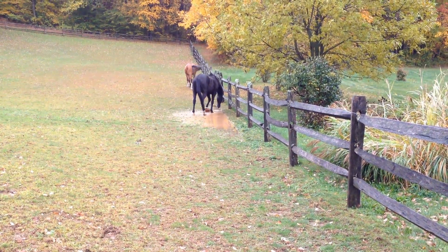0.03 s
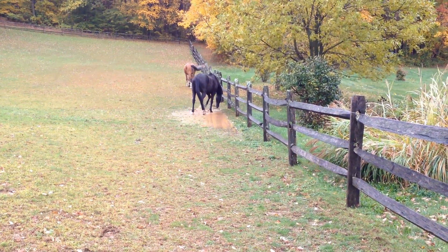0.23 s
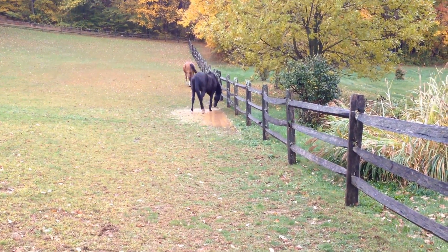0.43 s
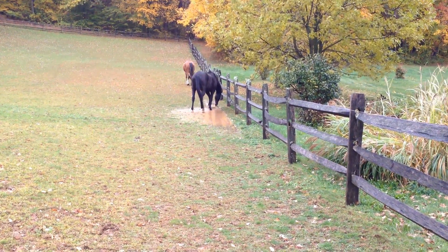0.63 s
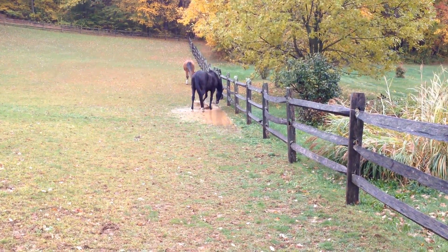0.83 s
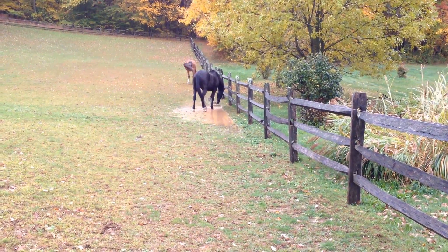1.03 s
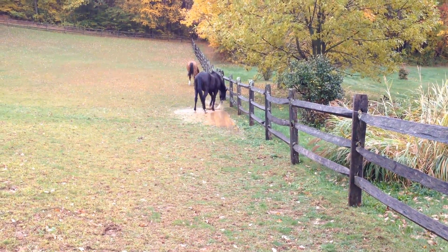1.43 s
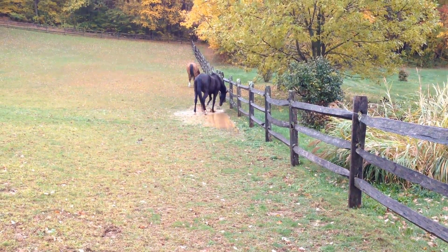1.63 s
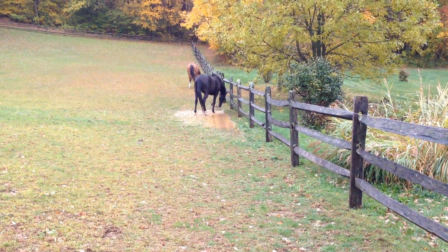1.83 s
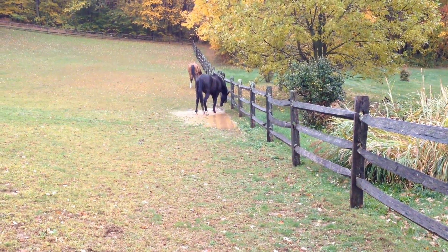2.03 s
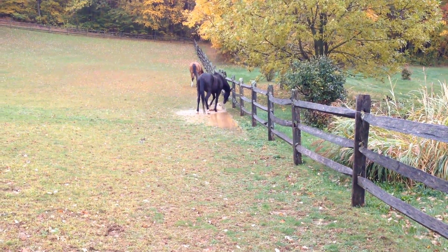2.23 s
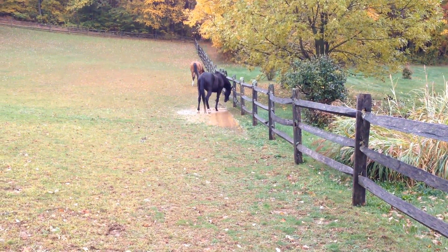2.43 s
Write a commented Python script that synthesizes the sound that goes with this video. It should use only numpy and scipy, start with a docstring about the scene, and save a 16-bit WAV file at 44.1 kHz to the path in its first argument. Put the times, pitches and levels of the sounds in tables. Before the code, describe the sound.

Splashes come in a steady rhythm as a horse drags its hoof through a puddle outdoors, with sloshing, pattering drops and small plops. Low wind flutters bump the microphone throughout, and an insect trills faintly in the background.

```python
"""Horse pawing a puddle

Out in a pasture, some way from the microphone, a horse paws a muddy puddle about every 0.7 s.
Each stroke churns the water, throws spray that patters back and ends in a sharp slap; a few bubbles
plop. Wind buffets the microphone in soft low flutters and bumps, over a faint insect trill and a
quiet, distant hiss."""
import sys
import numpy as np
from scipy import signal
from scipy.fft import rfft, irfft
from scipy.io import wavfile
from scipy.ndimage import uniform_filter1d

SR = 44100
rng = np.random.default_rng(int(sys.argv[2]) if len(sys.argv) > 2 else 0)


def pcm_store(signal):
    """Save signal as 16-bit PCM."""
    levels = np.round(np.clip(np.atleast_2d(signal), -1, 1) * 32767)
    wavfile.write(sys.argv[1], SR, levels.astype(np.int16).T)


N = 110250
T = np.arange(N) / SR


def slaps(rise_s=0.00089, ring_width_hz=520):
    """Hoof and thrown water hit the puddle: fine splatter and the short ring of a trapped air pocket."""
    # slaps: start_s, level_db, decay_s, ring_hz, ring_over_splatter_db
    hits = [(0.253, -61, .004, 1097, 9), (.378, -64.5, 0.0041, 966, 12.5), (0.378, -67.5, 0.0047, 1970, 14),
            (.436, -60, .006, 2100, 9), (.447, -60.5, 0.0085, 4400, 4), (.575, -63, .007, 4540, -3),
            (0.7113, -52, 0.0052, 2000, 1), (.713, -56, .005, 5910, 2.5), (0.7246, -47.5, 0.0074, 1908, 5),
            (0.761, -57, 0.0034, 6560, -8), (1.005, -59, 0.0093, 2470, 8), (1.066, -60, 0.0037, 8320, 3.5),
            (1.4446, -51.5, 0.0062, 1124, 8), (1.4461, -50, 0.011, 4400, 8), (1.455, -57, .007, 2100, 6.5),
            (1.477, -52.5, 0.008, 2070, 2), (1.489, -49, .004, 4570, 0), (1.593, -65, 0.018, 2090, 0),
            (1.608, -62.5, 0.0042, 1350, 9), (1.634, -69, .004, 2100, 13), (1.663, -57.5, 0.0034, 2030, 7),
            (1.733, -60.5, 0.011, 4240, 2.5), (1.798, -59, 0.007, 2110, 4), (2.147, -52, 0.007, 1680, -1),
            (2.181, -53, 0.011, 5480, -7), (2.236, -53, 0.0064, 4360, -11),
            (2.2434, -52.5, 0.011, 2112, 10), (2.247, -55.5, 0.0062, 1361, 5),
            (2.247, -61.5, .006, 676, 12), (2.476, -67.5, .003, 4400, 7.5)]
    # splatter spectrum: frequency_hz, gain_db
    spectrum = [(150, -22), (600, -15), (1000, -7), (1400, 1), (2200, 1), (3200, -7), (4400, 3.5),
                (6000, 0.5), (8500, -1), (10300, -10.5), (13000, -2), (14300, -18), (15700, -32)]
    splatter = colour(clumped(rng.standard_normal(N), patchy_db=2.5), spectrum)
    smooth = signal.butter(2, ring_width_hz / 2, fs=SR, output="sos")
    out = np.zeros(N)
    for start, db, decay, hz, ring_db in hits:
        wobble = signal.sosfilt(smooth, rng.standard_normal(N) + 1j * rng.standard_normal(N))
        wobble /= np.sqrt(abs(wobble) + 1e-12)  # evens out the ring's loudness
        cavity = unit((wobble * np.exp(2j * np.pi * hz * T)).real)
        ring = amp(ring_db) * cavity * strike(start, rise_s, decay * 0.53)
        out += amp(db) * (splatter * strike(start, rise_s, decay) + ring)
    return out


def plops(rise_s=0.0044):
    """Single larger bubbles swell and ring out in the puddle."""
    # bubbles: start_s, level_db, pitch_hz, decay_s
    bubbles = [(.186, -55, 1290, .009), (.506, -52.5, 2090, .005), (.591, -52, 2100, 0.0036),
               (.986, -51, 680, 0.0036), (1.009, -40.5, 1917, 0.0035), (1.016, -54.5, 603, .007),
               (1.042, -56.5, 1227, .007), (1.593, -48, 2060, 0.005), (1.711, -51.5, 538, 0.0032),
               (1.776, -57, 863, 0.0032), (1.822, -60, 735, .007), (1.858, -55, 1980, 0.0046),
               (2.150, -43.5, 1870, 0.0022)]
    out = np.zeros(N)
    for start, db, hz, decay in bubbles:
        t = np.maximum(T - start, 0)
        onset = np.minimum(t / rise_s, 1) * np.exp(np.minimum(t, rise_s) / decay)  # holds off the decay
        out += amp(db) * bubble(t, hz, decay) * onset
    return out


def spray(wash_gain=0.77):
    """Drops fall back on the puddle in clumps, over a finer wash."""
    # falling spray: time_s, level_db
    fall = [(0, -74.5), (.22, -73), (.36, -66.5), (.46, -61.5), (.58, -56.5), (.68, -70), (.74, -58),
            (.81, -73), (.96, -73), (1.02, -63.5), (1.25, -63), (1.42, -56.5), (1.5, -59), (1.57, -68),
            (1.61, -62), (1.69, -67), (1.86, -59.5), (2.04, -60.5), (2.21, -56), (2.27, -59.5), (2.33, -69),
            (2.5, -73)]
    # spray spectrum: frequency_hz, gain_db
    spectrum = [(400, -20), (1500, -11.5), (2200, 5.5), (3350, -10.5), (4030, 1.5), (4230, -1.5),
                (4550, 8.5), (5050, -5), (5400, 1), (6000, -1), (7000, -5.5), (8500, -2), (10000, -12),
                (11500, -7), (12800, -2), (14200, -15), (15700, -9)]
    drops = unit(patter(per_s=3500, spread_db=3.5))
    wash = wash_gain * rng.standard_normal(N)
    return colour(clumped(drops + wash, patchy_db=2.5), spectrum) * level(fall)


def churn():
    """The leg stirs the water to froth and drags deep sloshes through it."""
    # churned water: time_s, level_db
    stirring = [(0, -62.5), (.12, -79), (.26, -67.5), (.31, -69.5), (.38, -62.5), (.58, -66.5), (.66, -75),
                (.93, -80), (.99, -60.5), (1.05, -68), (1.1, -64), (1.3, -71.5), (1.48, -65), (1.56, -80),
                (1.6, -57), (1.69, -72.5), (1.73, -61.5), (1.9, -62), (2.02, -71), (2.22, -62.5),
                (2.32, -71), (2.5, -87)]
    # churn spectrum: frequency_hz, gain_db
    stir_spectrum = [(250, -34), (600, 2), (1000, -3.5), (1400, 3.5), (1700, 1.5), (2100, 6), (2600, -5),
                     (3300, -7), (6000, -16)]
    # deep sloshes: start_s, length_s, level_db
    sloshes = [(.22, 0.092, -61.5), (.965, .095, -57.5), (1.58, 0.063, -70), (1.71, 0.12, -72.5)]
    # slosh spectrum: frequency_hz, gain_db
    slosh_spectrum = [(50, -32), (200, 28), (400, 10), (700, 1), (1300, 0.5), (2200, -24), (5000, -50)]
    return froth(stir_spectrum) * level(stirring) + froth(slosh_spectrum) * swells(sloshes, edge_s=0.01)


def froth(spectrum, sizes=36, bubbles_per_s=1200, decay_cycles=4.3):
    """A crowd of small, quickly damped bubbles of many sizes."""
    t, out = T[:2048], np.zeros(N)
    for hz in np.geomspace(300, 4000, sizes):
        grain = unit(bubble(t, hz * rng.uniform(1.0, 1.04), decay_cycles / hz)) * np.sqrt(hz)
        out += signal.oaconvolve(patter(bubbles_per_s / sizes, spread_db=3), grain)[:N]
    return colour(out, spectrum)


def bubble(t, hz, decay_s, glide_per_s=4.2):
    """A ringing bubble whose pitch climbs as it nears the surface."""
    return np.sin(2 * np.pi * hz * (t + glide_per_s * t * t / 2)) * np.exp(-t / decay_s)


def patter(per_s, spread_db):
    """Random clicks of either sign, a few much larger than the rest."""
    size = amp(spread_db * np.minimum(rng.exponential(1, N), 4))
    return size * rng.choice([-1., 1.], N) * (rng.random(N) < per_s / SR)


def clumped(x, patchy_db):
    """Drops land in clumps: patches a few hundred Hz wide and some ms long swell and fade at random."""
    bands = signal.stft(x, nperseg=256, noverlap=192)[2]
    patches = rng.standard_normal(bands.shape[::-1]).T
    patches = uniform_filter1d(patches, size=3, axis=0)  # across frequency
    patches = unit(uniform_filter1d(patches, size=7, axis=1))  # along time
    return unit(signal.istft(bands * amp(patchy_db * patches), nperseg=256, noverlap=192)[1][:N])


def wind(steadiness=0.21, low_cut_hz=53.6):
    """Turbulence right at the microphone: flutters, a breeze and bumps, thinned by the wind filter."""
    # flutters: start_s, length_s, level_db
    gusts = [(.218, 0.091, -49), (.505, 0.035, -53.5), (.657, .047, -50), (.76, 0.015, -52),
             (.826, 0.15, -49.5), (.97, 0.194, -50.5), (1.397, .07, -51.5), (1.578, 0.045, -54.5),
             (1.655, 0.017, -54), (1.89, 0.078, -51), (2.02, 0.078, -50), (2.105, 0.061, -51)]
    # flutter spectrum: frequency_hz, gain_db
    gust_spectrum = [(20, -52), (40, -46), (65, -7), (100, -3), (145, 3), (190, -5), (250, -10), (330, -16),
                     (450, -32), (800, -57), (2000, -60)]
    # unbroken breeze: time_s, level_db
    breeze_levels = [(0, -58.5), (.55, -59.5), (.8, -70), (1.18, -61), (1.3, -65.5), (1.55, -63),
                     (1.75, -64.5), (1.81, -74), (2.1, -62.5), (2.25, -64), (2.32, -63), (2.5, -65)]
    # breeze spectrum: frequency_hz, gain_db
    breeze_spectrum = [(20, -45), (40, -28), (70, -3), (110, 2), (160, 0), (220, -8), (300, -12),
                       (450, -24.5), (800, -61), (2000, -65)]
    eddies = signal.hilbert(colour(rng.standard_normal(N), gust_spectrum))
    flutter = unit(eddies.real / (abs(eddies) + 0.27) ** steadiness) * swells(gusts, edge_s=0.008)
    breeze = colour(rng.standard_normal(N), breeze_spectrum) * level(breeze_levels)
    wind_filter = signal.butter(2, low_cut_hz, "highpass", fs=SR, output="sos")
    return signal.sosfiltfilt(wind_filter, flutter + breeze + bumps())


def bumps(rise_share=0.84, sag_per_s=4.4, puff_db=-22.5):
    """Single pushes of air on the microphone: a low thump that sags in pitch, with a soft puff."""
    # bumps of air: peak_s, level_db, pitch_hz, fall_s
    pushes = [(.084, -41.5, 130, 0.0048), (0.225, -37.5, 155, 0.0058), (0.237, -39.5, 202, 0.0046),
              (0.249, -41, 222, 0.0069), (.266, -39, 197, 0.0081), (.291, -32, 188, 0.0038),
              (.372, -42, 187, 0.0031), (.416, -44.5, 157, 0.0058), (.4845, -39.5, 290, 0.0032),
              (0.488, -29, 140, 0.0052), (0.497, -30, 163.5, 0.0095), (.617, -46.5, 134, 0.0036),
              (.666, -52, 158, 0.0085), (.691, -44, 173, .008), (.834, -38.5, 183, 0.0051),
              (.863, -42, 179, 0.0078), (0.894, -40.5, 180, 0.0084), (.922, -40, 162, 0.0088),
              (.956, -43, 162, 0.0095), (.981, -43, 164, 0.0033), (1.012, -37, 162, .005),
              (1.034, -40, 168, 0.0036), (1.047, -36.5, 190, 0.0034), (1.072, -39.5, 147, 0.0056),
              (1.095, -39.5, 170, 0.0026), (1.113, -34, 146, 0.0067), (1.143, -36, 182, 0.0059),
              (1.407, -42, 214, 0.0081), (1.447, -34, 175.5, 0.0061), (1.583, -44, 226, 0.0061),
              (1.594, -40, 163, 0.0043), (1.895, -41.5, 169, 0.0038), (1.924, -35.5, 155, 0.0048),
              (2.0484, -27, 173, 0.0067), (2.057, -28.5, 207, 0.0031), (2.069, -34.5, 164, 0.0033),
              (2.147, -41, 133, 0.0049)]
    # puff spectrum: frequency_hz, gain_db
    spectrum = [(120, -18), (280, 6), (430, -1.5), (650, -17), (1500, -36)]
    puff = amp(puff_db) * colour(rng.standard_normal(N), spectrum)
    out = np.zeros(N)
    for peak, db, hz, fall in pushes:
        t = T - peak
        width = np.where(t < 0, rise_share * fall, fall)
        thump = np.cos(2 * np.pi * hz * (t - sag_per_s * t * t / 2))
        out += amp(db) * np.exp(-(t / width) ** 2) * (thump + puff)
    return out


def insect(level_db=-73, pitch_hz=6650, fall_hz=380, jitter_hz=125):
    """A thin trill in the grass: wing strokes pulse in groups, each stroke falling in pitch."""
    # swell and fade of the trill: time_s, gain_db
    swell = [(0, 1.5), (.5, -1.5), (1, 0), (1.3, 0), (2.2, -2.5), (2.5, -2.5)]
    strokes_per_s, groups_per_s, group_depth = 53, 14.3, 0.32
    stroke = (T * strokes_per_s + rng.random()) % 1
    jitter = unit(uniform_filter1d(rng.standard_normal(N), size=60))
    hz = pitch_hz + fall_hz * (.5 - stroke) + jitter_hz * jitter
    groups = 1 + group_depth * np.sin(2 * np.pi * (groups_per_s * T + rng.random()))
    trill = np.sin(np.pi * stroke) * groups * np.sin(2 * np.pi * np.cumsum(hz) / SR)
    return amp(level_db) * level(swell) * unit(trill)


def pasture(x, echo_db=-17.5, t60_s=0.04):
    """Adds faint, short scatter from ground, fence and trees."""
    t = T[:SR // 4]
    tail = rng.standard_normal(len(t)) * amp(-60 * t / t60_s) * (t > .003)
    return x + amp(echo_db) * signal.fftconvolve(x, tail / np.linalg.norm(tail))[:N]


def distant_hiss(level_db=-64.5):
    """The steady hiss of the outdoors, far off."""
    # hiss spectrum: frequency_hz, gain_db
    spectrum = [(20, -34), (60, -18), (150, 6.5), (300, 2.5), (500, -0.5), (1000, -3.5), (2000, -1.5),
                (3300, -11.5), (4000, -9), (4550, -4.5), (5100, -16), (6500, -4.5), (7400, -9),
                (10000, -16), (13000, -16.5), (15700, -18)]
    return amp(level_db) * colour(rng.standard_normal(N), spectrum)


def amp(db):
    """Decibels to gain."""
    return 10 ** (np.asarray(db) / 20)


def unit(x):
    """Scales to rms 1."""
    return x / np.sqrt(np.mean(x ** 2) + 1e-20)


def level(points):
    """Gain over time from points of time_s, level_db."""
    return amp(np.interp(T, *np.transpose(points)))


def colour(x, spectrum):
    """Filters x through points of frequency_hz, gain_db and scales it to rms 1."""
    hz, db = np.transpose(spectrum)
    bins_hz = np.fft.rfftfreq(len(x), 1 / SR)
    gain = amp(np.interp(np.log(bins_hz + 1), np.log(hz), db))
    return unit(irfft(rfft(x) * gain, len(x)))


def strike(start_s, rise_s, decay_s):
    """Quick rise, exponential fall."""
    t = T - start_s
    return np.clip(t / rise_s, 0, 1) * np.exp(-np.maximum(t - rise_s, 0) / decay_s)


def swells(rows, edge_s):
    """Attack, hold and release for each row of start_s, length_s, level_db."""
    return sum(amp(db) * np.clip(np.minimum(T - start, start + length - T) / edge_s + .5, 0, 1)
               for start, length, db in rows)


def scene():
    """One microphone: puddle and insect out in the pasture, wind on the capsule, hiss behind."""
    hiss = distant_hiss()
    puddle = slaps() + plops() + spray() + churn()
    return (pasture(puddle + insect()) + wind() + hiss)[None]


def record(dry, cutoff_hz=15740):
    """The recorder's band limit."""
    lowpass = signal.firwin(511, cutoff_hz, window=("kaiser", 9), fs=SR)
    return signal.oaconvolve(dry, lowpass[None], "same")


dry = scene()
out = record(dry)
pcm_store(out)
```